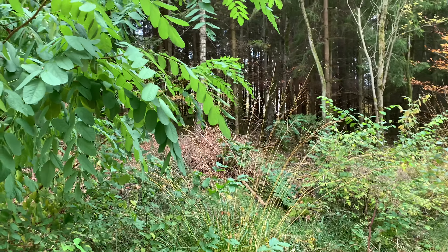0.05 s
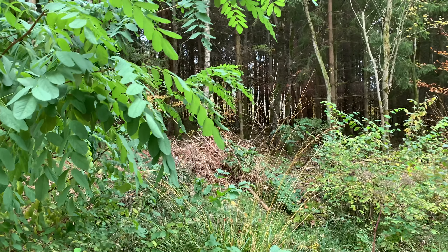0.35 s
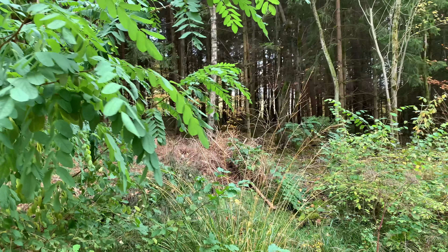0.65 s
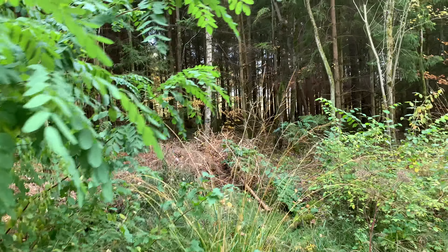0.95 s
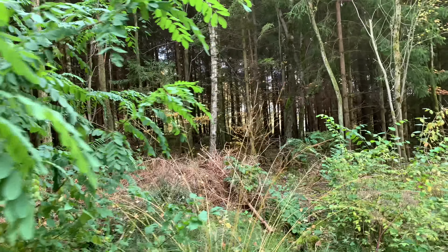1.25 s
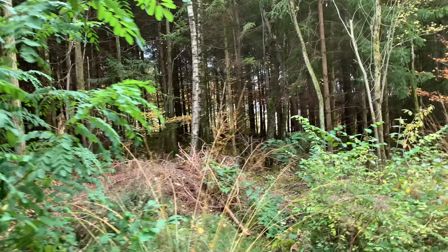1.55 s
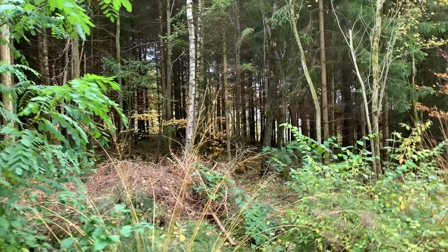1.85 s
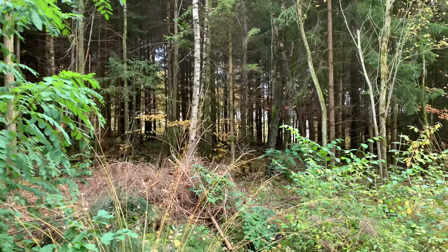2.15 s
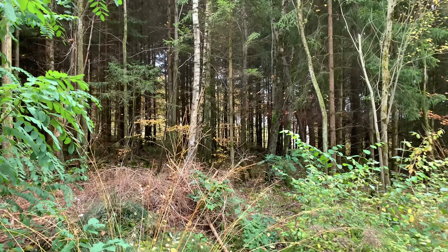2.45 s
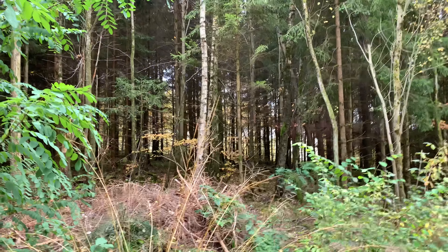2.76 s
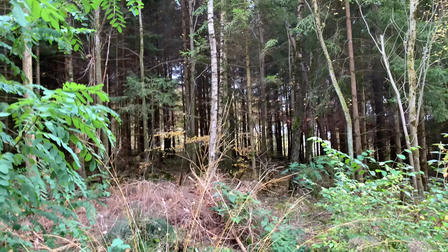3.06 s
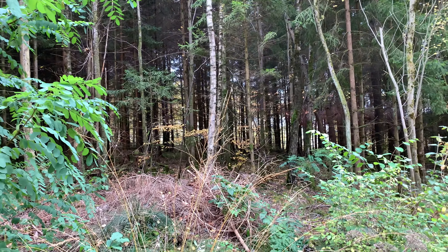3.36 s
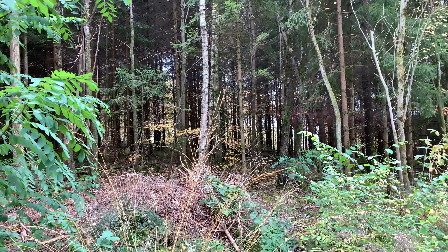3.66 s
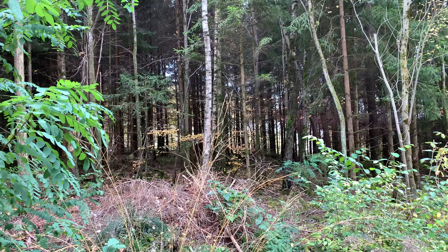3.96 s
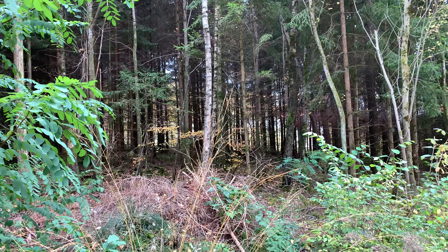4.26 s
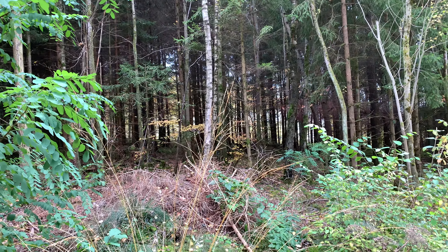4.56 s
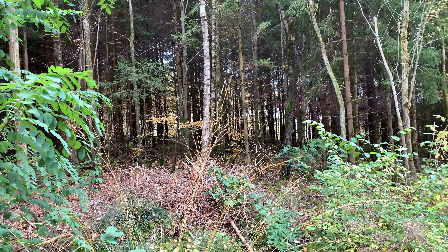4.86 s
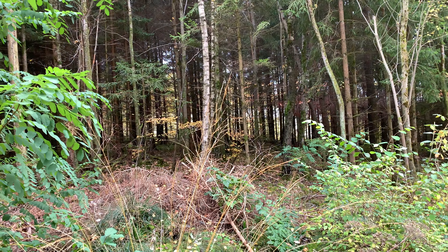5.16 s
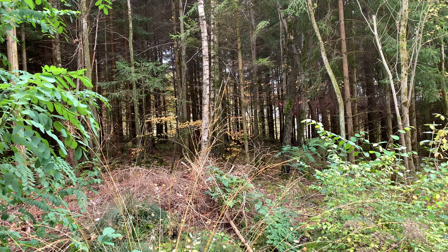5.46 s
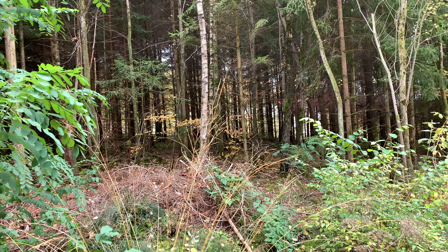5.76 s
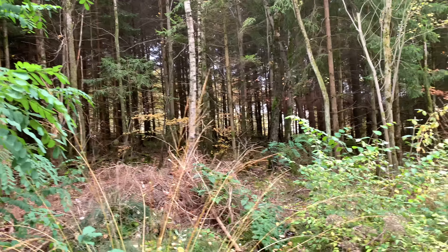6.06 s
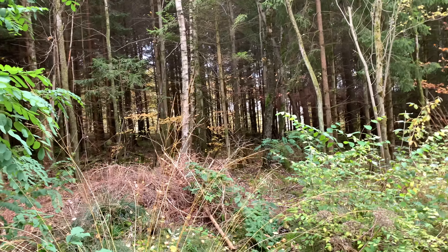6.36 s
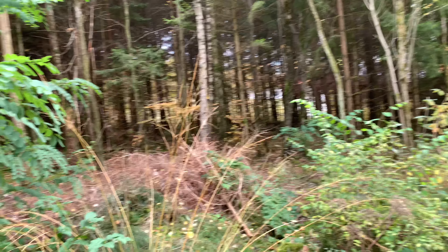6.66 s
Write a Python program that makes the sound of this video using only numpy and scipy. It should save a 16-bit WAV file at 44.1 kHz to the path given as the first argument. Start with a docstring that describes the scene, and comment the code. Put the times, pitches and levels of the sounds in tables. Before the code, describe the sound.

From the very start, a distant machine gun fires one long, loud burst, heard from inside a wood. The rattle is fast and speeds up slightly, from about 17 to 20 shots a second. Each shot has a low thump, a dry crack and hard echoes, and the trees scatter them into a dense roar. Close to the microphone, leaves swish briefly and twigs tick between about 0.3 and 0.8 seconds, with a fainter brush of leaves near 2.6 seconds, all well beneath the gunfire. At about 4.6 seconds the firing stops. The roar dies down into a dull, distant roll that keeps fading until the end, at around 7 seconds. A few faint twig ticks sound nearby between 6.2 and 6.6 seconds, over a very faint even hiss.

```python
"""In a wood, with a range beyond the trees: a machine gun fires one long burst, speeding up from 17 to
20 rounds a second. Each round reaches the microphone as a report, a ground thump, a dry twin crack and
hard echoes. The trunks scatter it into a dense roar, which rolls away over far country when the gun
stops. Close to the microphone, leaves brush and twigs tick over a faint even hiss."""
import sys
import numpy as np
from scipy import signal
from scipy.fft import rfft, irfft, next_fast_len
from scipy.io import wavfile
from scipy.ndimage import uniform_filter1d, minimum_filter1d

SR = 44100
rng = np.random.default_rng(int(sys.argv[2]) if len(sys.argv) > 2 else 0)


def wrap_up_sound(samples):
    """Save the sound to the file named by the first command line argument, as 16-bit audio."""
    columns = np.atleast_2d(samples).T
    # keep every value between -1 and 1, then stretch to whole-number steps
    tamed = np.clip(columns, -1, 1)
    steps = np.round(tamed * 32767).astype(np.int16)
    wavfile.write(sys.argv[1], SR, steps)


N = 300321
LEAD = 2 * SR  # samples of earlier fire that still ring in the wood


def amp(db):
    """Decibels to gain."""
    return 10 ** (np.asarray(db) / 20)


def unit(x):
    """Scale to rms 1."""
    return x / np.sqrt(np.mean(x ** 2) + 1e-20)


def along(points, hz):
    """Read (f/Hz, value) points on a log frequency axis."""
    f, v = np.transpose(points)
    return np.interp(np.log(hz + 1), np.log(f), v)


def filtered(x, response):
    """Pass x through a gain given as a function of frequency."""
    size = next_fast_len(len(x) + SR // 2)
    return irfft(rfft(x, size) * response(np.fft.rfftfreq(size, 1 / SR)), size)[:len(x)]


def noise(spectrum):
    """Coloured noise of rms 1."""
    return unit(filtered(rng.standard_normal(N), lambda hz: amp(along(spectrum, hz))))


def add_wave(out, at_s, db, hz, crest_s):
    """Add one blast, rounded by distance to a few swings of pressure that crest and die away."""
    t = np.arange(int(10 * crest_s * SR)) / SR
    envelope = (t / crest_s * np.exp(1 - t / crest_s)) ** 2
    wave = -amp(db) * envelope * np.sin(2 * np.pi * hz * t)
    place = out[LEAD + round(at_s * SR):][:len(t)]
    place += wave[:len(place)]


def arrivals(times, strength_db, waves, wander_s=0, detune=0, fade_db=0.3):
    """Every round sends the same waves; moving air shifts their strength, timing and pitch."""
    out = np.zeros(LEAD + N)
    for delay, hz, crest_s, db in waves:
        air = rng.standard_normal((len(times), 3))
        for fired_s, strength, (fade, late, sharp) in zip(times, strength_db, air):
            at_s = fired_s + delay + wander_s * late
            add_wave(out, at_s, db + strength + fade_db * fade, hz * np.exp(detune * sharp), crest_s)
    return out


# rounds at the microphone, against their usual strength: t/s, report level/dB, echo level/dB,
# crack level/dB
BURST = [(0.0519, 1, 0.0, -1), (0.1116, 2, 2, 4.5), (0.1728, -4.5, -1.0, 2.5), (0.2274, 1.5, 2, -1),
         (0.2817, 0.5, -0.5, 3.5), (0.3324, 0, -0.5, 5.5), (0.385, 0, 0.5, -0.5), (0.4455, 1.5, 0, -0.5),
         (0.5052, -4.5, 3, -0.5), (0.5635, 3.5, -3.5, 2), (0.6328, 0.5, -0.5, 4), (0.6907, 0, 2.5, 1),
         (0.745, 1, -3, 4), (0.8038, -2, 5.5, 4), (0.8631, -0.5, 4, -3), (0.9221, 0.5, 0, 2),
         (0.981, -0.5, 0, 0.0), (1.0355, -1.5, 1, 2), (1.0938, -4, -3.5, 4), (1.149, 2, 1.5, 5),
         (1.2039, 0.5, 1.5, 0), (1.2576, -1, -1, 1.5), (1.3162, 1.5, -1, -0.5), (1.3735, 2, -4, 5),
         (1.4271, -3, 4, -0.5), (1.4886, 4, -2, 3), (1.5483, -1.0, -1, 1), (1.6025, -1.5, 0.5, -1),
         (1.6584, -3.5, 3.5, -1.5), (1.7157, 3, -2.5, 4.5), (1.7709, 0.0, 3.5, 1.0), (1.823, 0, -7, -2.5),
         (1.8727, -3, 4, 3.5), (1.9223, 0.5, 2.5, 1), (1.9733, 1, -0.5, 2.5), (2.0243, 0, 2, -8),
         (2.082, -3, 1.5, 3), (2.1433, 2.5, -4, -5), (2.1982, -3, 0.5, 1.5), (2.2478, 1, 5, 2),
         (2.2977, -4.5, 2, -4), (2.3487, 1, -5, -6), (2.3985, -1, 1, -4), (2.4513, 1, 0.5, -0.5),
         (2.5071, 4.5, -4, -4.0), (2.5646, 0, 2, -4.5), (2.6164, 0, -2, 2), (2.6655, 0.5, -3.5, -2),
         (2.715, 3, 3, -1), (2.7636, 1.0, -5.5, -6.5), (2.8145, -1.0, 1.0, -4.5), (2.8703, -1, -1.5, -1.5),
         (2.9275, -1, -0.5, -7.5), (2.9829, 1.5, -3.5, -4), (3.0356, 1.5, -1, -1.5), (3.0891, 0, 1.5, 1),
         (3.1405, -4, -3, -1), (3.1912, -0.5, 5.5, 5), (3.2397, -3, -0.5, 5), (3.2902, 2.5, -2, -7),
         (3.3381, 2, -1.0, -1), (3.388, -5, -3.5, -3.5), (3.4401, 0, 3.0, 0.5), (3.492, 1.5, -1, -1.5),
         (3.5421, -5.5, 6, 5.5), (3.595, -3, -3.5, -5), (3.6491, -3.5, 4, 0.5), (3.7002, -3.5, -1.5, 2),
         (3.7525, 2, 0.0, -5), (3.8034, -2, 4.5, 3), (3.8556, 0.5, -1, 3.5), (3.9071, 0.5, -1.5, -4),
         (3.9541, -7.5, 1, 0.5), (4.0042, 1, 2.0, -2.5), (4.0565, -1.5, 0, 1), (4.1061, -1, -2.5, 0.5),
         (4.1547, 0, 1, -1), (4.2036, 1, 3, -2), (4.2578, -3.0, -1.5, 4), (4.3101, -4, 3.5, 1.5),
         (4.3603, -4, 3, -0.0), (4.4119, -3.5, 2, -1.5), (4.4622, -3, 3.5, -1), (4.515, -4.5, 0.5, -8),
         (4.5658, -0.5, 3, -4.0), (4.6155, -2, 0, 2)]

def trigger(earlier_per_s=17.3, jitter_s=0.002):
    """Time and strengths of every round; the gun is already firing when the scene opens."""
    back_s = np.arange(int(earlier_per_s * LEAD / SR) - 1, 0, -1) / earlier_per_s
    earlier = np.zeros((len(back_s), len(BURST[0])))
    earlier[:, 0] = BURST[0][0] - back_s + jitter_s * rng.standard_normal(len(back_s))
    return np.vstack([earlier, BURST]).T


# waves of the report: delay t/s, pitch f/Hz, crest t/s, level/dB
REPORT_WAVES = [(.0016, 493, .0012, -6), (0.00476, 560, 0.00099, -6), (0.0011, 290, 0.0042, -11)]

def report(times, strength_db):
    """The blast from the range, first to reach the microphone through the trees."""
    return arrivals(times, strength_db, REPORT_WAVES, detune=0.022)


# bass waves: delay t/s, pitch f/Hz, crest t/s, level/dB
THUMP_WAVES = [(.0036, 73, 0.0063, -13.5), (0.034, 82.3, 0.011, -29.5), (0.0443, 69.7, .014, -23.5),
               (.137, 81, .014, -34), (.531, 42.9, 0.034, -40.5)]

def ground_thump(times, strength_db):
    """Long, slow swings of pressure under each report."""
    return arrivals(times, strength_db, THUMP_WAVES)


# echoes off trunks: earliest delay t/s, latest delay t/s, pitch f/Hz, crest t/s, level/dB
TRUNK_PATHS = [(.005, 0.008, 645, 0.00098, -12), (.007, .012, 664, 0.0033, -16.5),
               (.007, 0.01, 1495, 0.00029, -14), (.02, 0.03, 2550, 0.0004, -21.5),
               (.02, 0.049, 1900, .0004, -22.5)]

def trunk_glances(times, strength_db, spread_db=2, detune=0.12):
    """Short echoes find a different path among the trunks each time and make the rattle coarse."""
    out = np.zeros(LEAD + N)
    for first, last, hz, crest_s, db in TRUNK_PATHS:
        delays = first + (last - first) * rng.random(len(times))
        paths = rng.standard_normal((len(times), 2))
        for at_s, strength, (fade, sharp) in zip(times + delays, strength_db, paths):
            add_wave(out, at_s, db + strength + spread_db * fade, hz * np.exp(detune * sharp), crest_s)
    return out


# waves of the strongest echo: delay t/s, pitch f/Hz, crest t/s, level/dB
ECHO_WAVES = [(.0181, 543, 0.0014, -3), (0.01616, 277, 0.0052, -17)]

def hard_echo(times, strength_db):
    """A strong reflection lands close behind each report."""
    return arrivals(times, strength_db, ECHO_WAVES, detune=0.03)


# the pair of cracks: delay t/s, pitch f/Hz, crest t/s, level/dB
CRACK_WAVES = [(.0163, 2420, 0.00048, -15.5), (0.0182, 2220, 0.00026, -14)]

def twin_crack(times, strength_db):
    """Two very short, high waves about 2 ms apart make a dry edge on the hard echo."""
    return arrivals(times, strength_db, CRACK_WAVES, wander_s=0.0001, detune=0.066)


# ringing wave: delay t/s, pitch f/Hz, crest t/s, level/dB
RING_WAVES = [(.0211, 676, 0.0071, -26.5)]

def ring(times, strength_db, growth_db_per_s=1.5):
    """A brief tone follows the hard echo and firms up through the burst."""
    return arrivals(times, strength_db + growth_db_per_s * times, RING_WAVES, detune=0.015)


# separate distant reflections: delay t/s, level/dB
SLAP_RETURNS = [(.0431, -16.5), (.0459, -18.5), (.058, -11), (.11, -19.5), (.1395, -26), (.183, -18),
                (.215, -18.5), (.2255, -19), (.2735, -16.5), (.32, -19), (.357, -18.5), (.3945, -18.5),
                (.407, -24.5), (.572, -27), (1.207, -37), (1.365, -35), (1.603, -43), (1.888, -40)]

def slaps(times, strength_db, hz=566, crest_s=0.0013):
    """Each blast slaps back from the tree line and from further country."""
    waves = [(delay, hz, crest_s, db) for delay, db in SLAP_RETURNS]
    return arrivals(times, strength_db, waves, wander_s=0.00038, detune=0.1)


# scattered sound that is alike from round to round: f/Hz, share (0-1)
STEADY_SHARE = [(100, 0.91), (290, 0.75), (500, 0.55), (1200, 0.06), (3000, 0.07)]

def scatter(blows, colour_db, decay, rise_s, lump_db=2.0, even_hz=1500, size=512, hop=128):
    """Diffuse answer to a train of blows: part repeats with each one, part is stirred by moving air."""
    grid = dict(nperseg=size, noverlap=size - hop)
    hz, t, tail_noise = signal.stft(rng.standard_normal(len(blows)), SR, **grid)
    hz = hz[:, None]
    # trees stand in clumps, so the answer comes back in lumps; needles and twigs even out the treble
    lumps_db = lump_db * unit(uniform_filter1d(rng.standard_normal(len(t)), size=4))
    lumps_db = lumps_db / (1 + (hz / even_hz) ** 2)
    envelope = (1 - np.exp(-t / rise_s)) * amp(lumps_db - 60 * t / along(decay, hz))
    power = envelope ** 2 / np.sum(envelope ** 2, axis=1, keepdims=True)
    share = np.clip(along(STEADY_SHARE, hz), 0, 1)
    # every blow sets off the same steady tail
    tail = signal.istft(tail_noise * np.sqrt(power * share / hop), SR, **grid)[1]
    steady = signal.fftconvolve(blows, tail)[:len(blows)]
    # the stirred parts add up in power, not in phase
    blow_power = np.bincount(np.arange(len(blows)) // hop, blows ** 2, len(t)) / hop
    summed_power = np.abs(signal.fftconvolve(power, blow_power[None], axes=1)[:, :len(t)])
    air_noise = signal.stft(rng.standard_normal(len(blows)), SR, **grid)[2]
    stirred = signal.istft(air_noise * np.sqrt(summed_power * (1 - share)), SR, **grid)[1]
    return filtered(steady + stirred[:len(blows)], lambda f: amp(colour_db(f)))


# colour of the roar among the trunks: f/Hz, level/dB
ROAR_COLOUR = [(28, -16), (45, -0.5), (75, -0.7), (120, 1.1), (165, -4.5), (260, 1), (450, 0.5), (670, 1.8),
               (900, -5.5), (2450, -17.8), (2850, -22), (4000, -28), (5700, -39.5), (8900, -43),
               (14500, -71)]
# weighting for the part that the trunks scatter: f/Hz, level/dB
TRUNK_SCATTER = [(35, -3), (70, -2.5), (150, -8.5), (190, -9.5), (260, -5.5), (340, -7.5), (440, -1.7),
                 (560, -2.5), (690, -1), (770, -1.3), (870, -2), (1300, -0.3), (13000, 8), (14500, 4)]
# decay in the wood: f/Hz, 60 dB decay t/s
WOOD_DECAY = [(40, 3.3), (90, 0.46), (250, 2.08), (550, 2.43), (1200, 2.42), (2500, 1.93), (4500, 1.26),
              (8000, 0.61), (14000, 0.27)]

def wood_roar(blows, gain_db=37.0, sag_db_per_s=0.3956, cease_s=4.64):
    """Trunks around the microphone scatter the shots into a roar that sinks slowly through the burst."""
    roar = scatter(blows, lambda hz: along(ROAR_COLOUR, hz) + along(TRUNK_SCATTER, hz),
                   WOOD_DECAY, rise_s=0.08)
    sag_db = sag_db_per_s * np.clip(np.arange(-LEAD, N) / SR, 0, cease_s)
    return amp(gain_db - sag_db) * roar


# colour of the distant roll: f/Hz, level/dB
ROLL_COLOUR = [(18, -17.5), (30, -22.5), (157, -19), (279, -12), (315, -6), (424, -4), (644, -3.5),
               (998, -17.5), (1240, -17.5), (2170, -28), (3500, -53.5), (4550, -90), (7700, -120)]
# decay over far country: f/Hz, 60 dB decay t/s
FAR_DECAY = [(100, 15), (450, 8.3), (1200, 8.3), (3000, 5.7)]

def far_roll(blows, gain_db=22):
    """Far country returns a dull, slow roll that outlasts the roar."""
    return amp(gain_db) * scatter(blows, lambda hz: along(ROLL_COLOUR, hz), FAR_DECAY, rise_s=0.23)


def near_bounce(x, delay_s=0.001358, bounce_db=-16, dull_hz=4200):
    """A weak reflection beside the microphone combs the middle range."""
    def comb(hz):
        return 1 - amp(bounce_db) * np.exp(-2j * np.pi * hz * delay_s) / (1 + (hz / dull_hz) ** 4)
    return filtered(x, comb)


def gunfire():
    """The burst as heard from inside the wood: distinct arrivals, then their roar and roll."""
    times, report_db, echo_db, crack_db = trigger()
    blast_db = (report_db + echo_db) / 2
    shots = (report(times, report_db) + ground_thump(times, blast_db)
             + twin_crack(times, crack_db) + hard_echo(times, echo_db) + ring(times, blast_db)
             + slaps(times, blast_db) + trunk_glances(times, blast_db))
    blows = np.zeros(LEAD + N)
    blows[np.round(times * SR).astype(int) + LEAD] = amp(blast_db)
    diffuse = near_bounce(wood_roar(blows) + far_roll(blows))
    return (shots + diffuse)[LEAD:]


def branch_shade(x, shade_db=-3, shade_hz=3990, clear_at_s=1.24, clearing_s=0.17):
    """A leafy branch in front of the microphone dulls the treble until it is passed."""
    cover = (1 - np.tanh((np.arange(N) / SR - clear_at_s) / clearing_s)) / 2
    treble = filtered(x, lambda hz: hz ** 2 / (hz ** 2 + shade_hz ** 2))
    return x + (amp(shade_db * cover) - 1) * treble


# colour of the hiss: f/Hz, relative level/dB
HISS_COLOUR = [(100, 4), (3000, 1), (6500, -2), (9500, 1), (12000, -2), (15500, -6)]

def hiss(level_db=-83.5):
    """A faint, even noise floor."""
    return amp(level_db) * noise(HISS_COLOUR)


# branches at the microphone: loudest t/s, level/dB, t/s to swell or fade by a factor e
BRANCH_PASSES = [(.355, -47, 0.041), (.48, -48, 0.055), (2.6, -55, .14), (3.15, -62, 0.065)]
# colour of brushing leaves: f/Hz, relative level/dB
LEAF_COLOUR = [(2000, -28), (6000, -6), (11000, -5), (16000, 5.5)]

def leaves(grain_db=4):
    """Each leafy branch slides past the microphone with a grainy swish that swells and fades."""
    grains = amp(grain_db * unit(uniform_filter1d(rng.standard_normal(N), size=90)))
    t = np.arange(N) / SR
    level = sum(amp(db) * np.exp(-np.abs(t - at_s) / life_s) for at_s, db, life_s in BRANCH_PASSES)
    return level * unit(grains * noise(LEAF_COLOUR))


# twigs close to the microphone: t/s, peak level/dB, pitch f/Hz, bandwidth as a share of the pitch
TWIG_TICKS = [(0.4522, -36, 11800, 0.94), (0.4755, -25.5, 12330, 1), (0.7737, -40, 12400, 1),
              (6.185, -64, 8970, .6), (6.2513, -43, 2900, .85), (6.636, -61, 3100, 0.33)]

def twigs(snap_s=0.0008, rustle_db=-17, rustle_s=0.013):
    """Dry little snaps through one broad resonance, each with a short rustle after it."""
    out = np.zeros(N + SR)
    t = np.arange(SR // 10) / SR
    envelope = np.exp(-t / snap_s) + amp(rustle_db) * np.exp(-t / rustle_s)
    for at_s, db, hz, width in TWIG_TICKS:
        snap = rng.standard_normal(len(t)) * envelope
        snap = filtered(snap, lambda f: (1j * f * hz / (hz * hz - f * f + 1j * f * hz * width)) ** 2)
        out[round(at_s * SR):][:len(t)] += amp(db) * snap / np.abs(snap).max()
    return out[:N]


def scene():
    """One microphone in the wood: distant gunfire, close twigs and leaves, and a faint hiss."""
    return (branch_shade(gunfire()) + twigs() + leaves() + hiss())[None]


def limiter(x, size=67):
    """The gain ducks smoothly for a few milliseconds around any peak over full scale."""
    needed_gain = minimum_filter1d(1 / np.maximum(np.abs(x), 1), 2 * size - 1)
    return x * uniform_filter1d(uniform_filter1d(needed_gain, size), size)


def record(dry, low_hz=35, top_hz=15720):
    """The microphone drops the deepest bass; the recorder limits the peaks and cuts the top treble."""
    mic = filtered(dry[0], lambda hz: (1j * hz) ** 2 / ((1j * hz) ** 2 + 1j * hz * low_hz + low_hz ** 2))
    return filtered(limiter(mic), lambda hz: hz < top_hz)[None]


dry = scene()
out = record(dry)
wrap_up_sound(out)
```